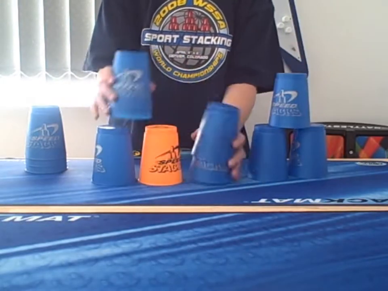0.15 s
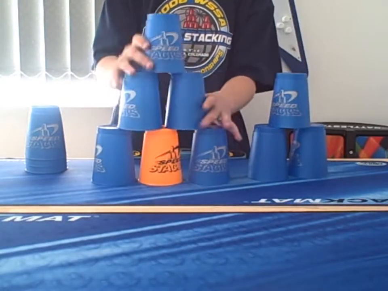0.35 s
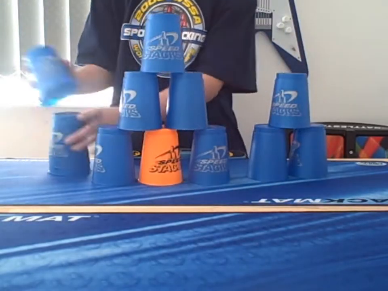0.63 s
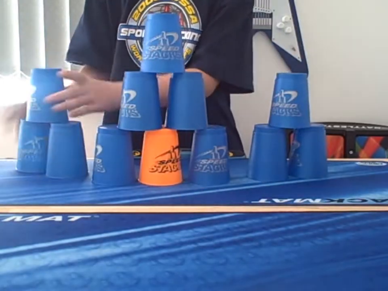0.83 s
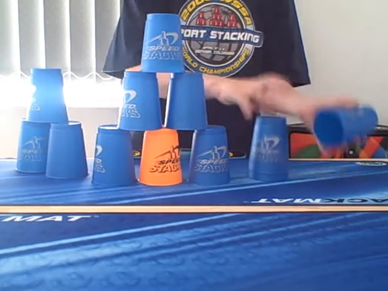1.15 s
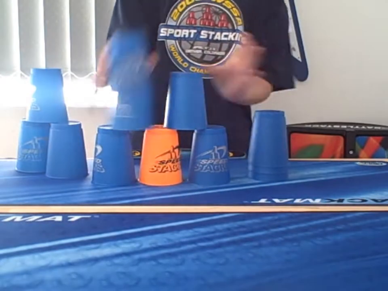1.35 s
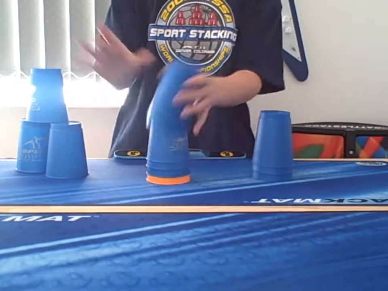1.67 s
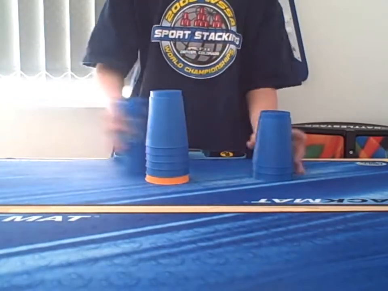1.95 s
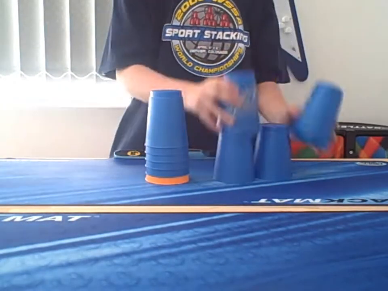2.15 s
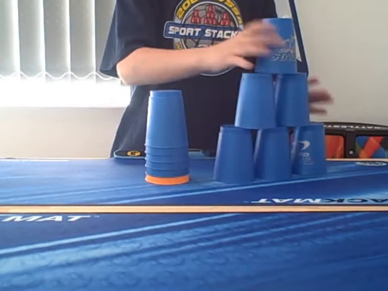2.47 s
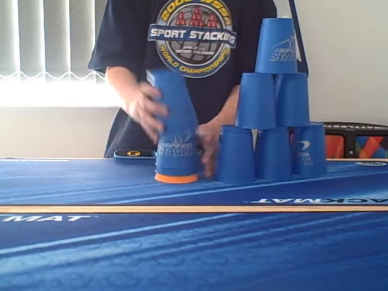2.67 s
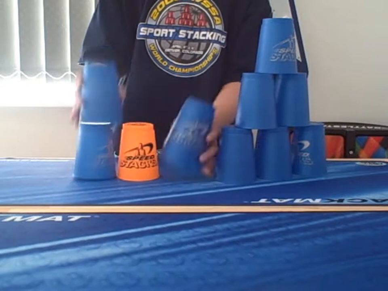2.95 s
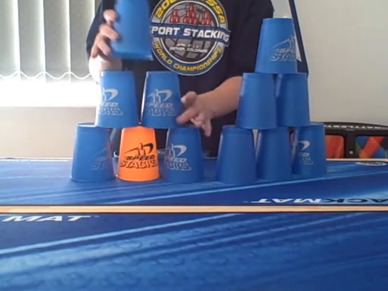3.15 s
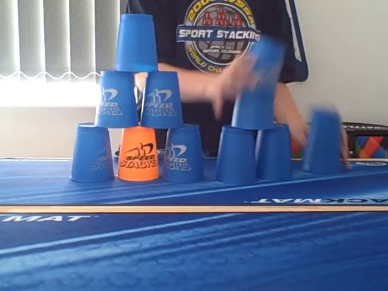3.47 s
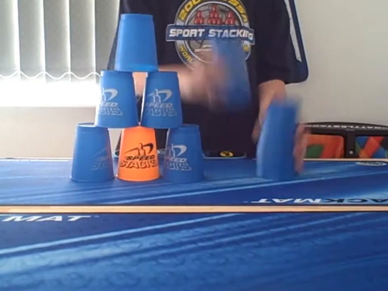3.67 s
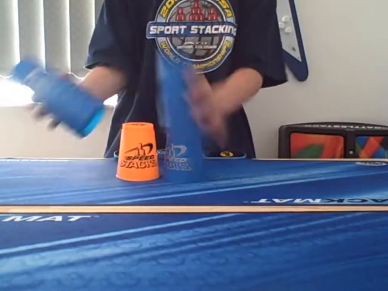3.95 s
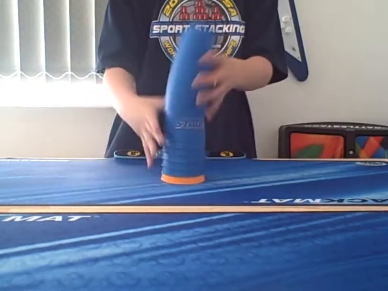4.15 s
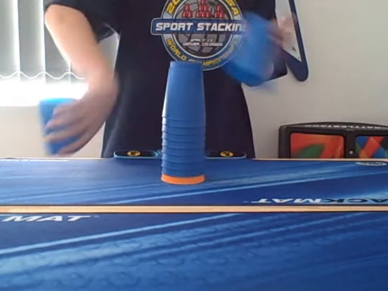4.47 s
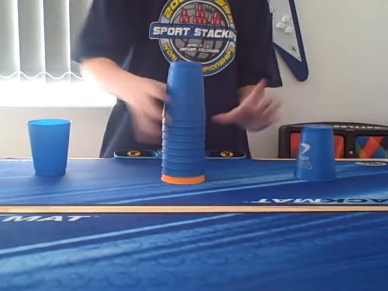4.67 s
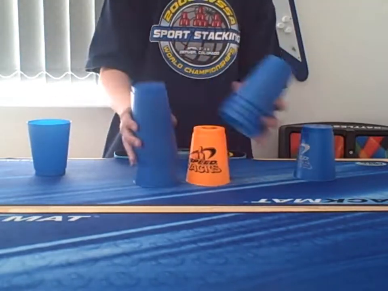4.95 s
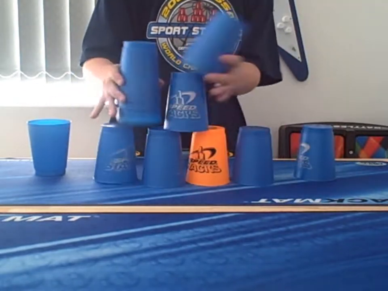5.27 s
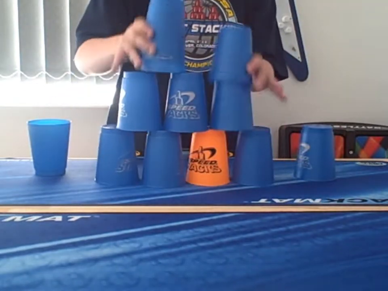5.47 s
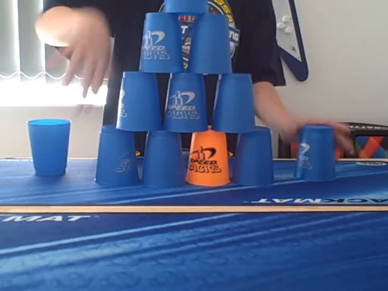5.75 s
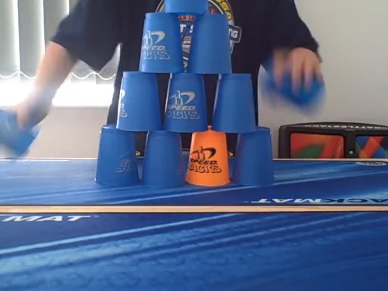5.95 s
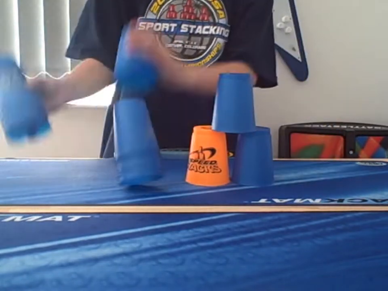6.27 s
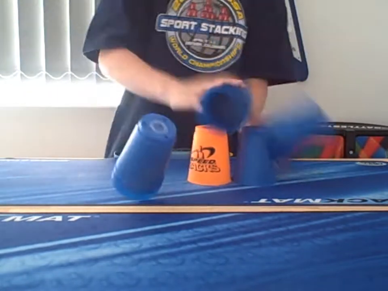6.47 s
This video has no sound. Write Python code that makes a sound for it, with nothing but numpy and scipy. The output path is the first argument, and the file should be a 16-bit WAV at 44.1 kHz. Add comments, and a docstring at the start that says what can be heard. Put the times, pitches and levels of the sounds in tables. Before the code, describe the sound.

Hollow plastic cups are handled at speed on a padded table, close to the microphone in a small, fairly dry room with faint hiss. Soft taps and scrapes lead into a rapid cluster of clacks to 0.5 s, then separate sharp knocks near 0.8 and 0.9. After a short gap, nesting slides and clicks rattle from 1.15 to 2.05, brightest around 1.5 and 1.9. Lighter placements follow at 2.35-2.55, then a lull with faint rubbing. Crisp knocks return at 3.1-3.3; from 3.5 to 4.3 cups collapse together in zipping scrapes and clacks, with a heavy thump near 4.0. It thins out, with a knock at 4.6, then quick stacking clacks run from 5.0 to 5.7. A quiet pause with faint rubbing precedes the loudest part, 6.2-6.6: a dense, harsh clatter of tumbling cups, slightly clipped, breaking off abruptly.

```python
"""A mat-covered table in a small furnished room: light plastic cups are stacked and nested at speed, close up.
Each contact is noise-driven modes of shell, walls, rim and table plus a shaped noise click.
Between contacts walls scrape: noise in uneven slips feeds the modes and a hiss. Heavy landings thump the table.
Contacts and scrapes get noise tails as room answer; quiet room tone lies below, and the loudest blows clip."""
import sys
import numpy as np
from scipy import signal
from scipy.fft import rfft, irfft, next_fast_len
from scipy.io import wavfile
from scipy.ndimage import uniform_filter1d

SR = 44100
rng = np.random.default_rng(int(sys.argv[2]) if len(sys.argv) > 2 else 0)


def store_pcm(level_fs):
    """Save levels as 16-bit WAV."""
    pcm = np.round(np.clip(level_fs, -1, 1) * 32767).astype(np.int16)
    wavfile.write(sys.argv[1], SR, np.atleast_2d(pcm).T)


N = 291942  # samples in the scene
SPAN = 16384  # block in samples; sounds and tails last fractions of it

# Cup contacts. Each row: start in seconds, shell level in dB, centre of the shell's ring in Hz, click level in dB.
CONTACTS = [(0.043, -36.5, 770, -34), (0.145, -28.5, 1040, -49.5), (0.188, -21.5, 560, -18),
            (0.258, -26, 556, -30), (0.321, -26, 1100, -43), (0.339, -18, 1120, -44),
            (0.351, -20, 950, -26), (0.436, -17.5, 990, -34), (0.45, -6.5, 1030, -15.5),
            (0.476, -16, 910, -27), (0.63, -26, 1230, -26), (0.691, -28, 790, -27),
            (0.777, -5.5, 1080, -14), (0.879, -23.5, 620, -45), (0.902, -7.5, 980, -14),
            (1.136, -44.5, 600, -53.5), (1.145, -15, 910, -31), (1.221, -32.5, 580, -23.5),
            (1.256, -41, 1200, -35), (1.343, -52, 594, -36.5), (1.381, -47, 842, -38.5),
            (1.409, -27, 730, -36), (1.432, -22.5, 860, -29.5), (1.459, -25, 1160, -48),
            (1.474, -20, 1130, -18.5), (1.503, -21.5, 900, -25), (1.531, -10.5, 780, -9),
            (1.581, -31, 980, -21), (1.617, -25, 730, -22.5), (1.721, -18.5, 586, -14.5),
            (1.765, -21, 790, -21), (1.792, -25.5, 754, -21), (1.819, -19, 720, -21),
            (1.878, -17.5, 980, -24), (1.89, -25, 920, -15), (1.907, -11.5, 745, -7.5),
            (2.011, -24, 537, -20.5), (2.026, -23.5, 464, -28.5), (2.24, -35, 1170, -44),
            (2.337, -33, 610, -40.5), (2.358, -26, 595, -21.5), (2.394, -13.5, 960, -18.5),
            (2.452, -28, 985, -31), (2.515, -18, 926, -30.5), (2.535, -13, 1050, -26),
            (2.749, -40, 1120, -45), (2.783, -41, 770, -41), (2.855, -46.5, 900, -47),
            (2.983, -41.5, 556, -47), (2.994, -32, 537, -37.5), (3.003, -36, 1090, -35),
            (3.074, -37.5, 655, -41.5), (3.102, -22.5, 567, -26), (3.165, -10.5, 1100, -18.5),
            (3.182, -11, 950, -21.5), (3.217, -24, 1030, -37.5), (3.237, -16.5, 980, -32),
            (3.267, -30, 1150, -33.5), (3.286, -6, 1020, -16.5), (3.294, -14.5, 990, -27.5),
            (3.505, -23, 750, -34), (3.541, -21.5, 940, -35), (3.565, -27, 546, -29.5),
            (3.598, -24, 580, -15.5), (3.623, -8, 730, -9), (3.648, -17.5, 705, -41.5),
            (3.78, -35, 554, -29.5), (3.801, -27, 675, -33), (3.813, -18, 870, -30.5),
            (3.877, -23.5, 900, -33.5), (3.906, -22, 890, -25.5), (3.928, -16.5, 990, -55.5),
            (3.988, -5, 574, -6), (4.011, -17, 660, -31.5), (4.071, -18, 770, -22),
            (4.083, -30, 1130, -20.5), (4.098, -15.5, 980, -14.5), (4.132, -22.5, 1040, -21.5),
            (4.154, -24, 630, -22.5), (4.214, -24.5, 700, -24.5), (4.219, -23.5, 660, -13),
            (4.264, -28.5, 770, -23), (4.348, -43, 1120, -35.5), (4.595, -25, 880, -46),
            (4.627, -15, 520, -27), (4.798, -32, 1000, -32), (4.894, -35, 804, -39.5),
            (4.937, -27, 980, -42), (5.015, -26, 607, -40), (5.021, -19.5, 594, -22),
            (5.105, -20.5, 590, -22.5), (5.235, -38, 650, -33), (5.284, -9, 980, -17),
            (5.308, -11, 1070, -21.5), (5.381, -13, 740, -22), (5.4, -21.5, 593, -28),
            (5.419, -18.5, 910, -19), (5.452, -20.5, 930, -34.5), (5.476, -26, 904, -39.5),
            (5.543, -14, 980, -29.5), (5.568, -7.5, 1050, -17), (5.589, -26, 1040, -41.5),
            (5.655, -19.5, 980, -41), (5.69, -7, 1010, -17), (5.707, -11.5, 1080, -21.5),
            (5.953, -42, 464, -67), (6.178, -23, 1120, -19), (6.195, -25, 900, -26),
            (6.221, -14, 950, -11.5), (6.233, -11.5, 810, 0), (6.241, -8.5, 730, -22.5),
            (6.27, -4, 1210, 1), (6.281, -11.5, 620, -26.5), (6.362, -21.5, 1010, -23.5),
            (6.425, -21.5, 1230, -15), (6.467, 0.5, 1130, -9.5), (6.48, -10, 1000, -12),
            (6.524, -6.5, 880, -1.5), (6.542, -16, 1190, -18.5), (6.552, -23, 517, -18.5),
            (6.571, -36, 650, -30.5), (6.603, -16, 490, -8.5)]
# Cups sliding over each other and over the mat. Each row: start and end in seconds, shell and hiss level in dB.
SCRAPES = [(0, 0.144, -49.5, -49), (0.123, 0.169, -42.5, -36), (0.198, 0.255, -30.5, -38),
           (0.258, 0.32, -35, -49), (0.318, 0.408, -27.5, -43.5), (0.638, 0.756, -47, -52),
           (1.148, 1.194, -27.5, -50.5), (1.195, 1.262, -53, -39.5), (1.251, 1.303, -40, -43),
           (1.369, 1.463, -46, -44), (1.446, 1.526, -35.5, -29.5), (1.527, 1.65, -36, -43.5),
           (1.611, 1.69, -33, -34), (1.738, 1.867, -40, -47.5), (1.858, 1.923, -29.5, -37.5),
           (1.909, 1.952, -36, -26), (2.023, 2.101, -49.5, -40.5), (2.173, 2.225, -60.5, -46),
           (2.234, 2.307, -49, -53), (2.401, 2.493, -30, -60.5), (2.518, 2.579, -21, -36.5),
           (2.749, 2.891, -52.5, -53), (2.938, 2.994, -62, -45), (2.999, 3.08, -52.5, -49.5),
           (3.091, 3.139, -31.5, -44.5), (3.179, 3.278, -24.5, -53.5), (3.496, 3.582, -31, -46),
           (3.557, 3.619, -27, -33), (3.589, 3.631, -22.5, -30.5), (3.616, 3.705, -36, -42),
           (3.688, 3.732, -50.5, -41.5), (3.793, 3.844, -28.5, -34.5), (3.909, 4.013, -25, -30),
           (4.013, 4.075, -35, -40.5), (4.078, 4.136, -24.5, -28), (4.145, 4.204, -38, -46.5),
           (4.216, 4.24, -44, -36), (4.252, 4.325, -32.5, -38.5), (4.438, 4.525, -66.5, -48.5),
           (4.605, 4.669, -26, -56), (4.789, 4.858, -45, -46.5), (4.844, 4.881, -38.5, -41),
           (4.959, 5.015, -68, -51.5), (5.029, 5.107, -46, -46.5), (5.109, 5.177, -30, -43.5),
           (5.315, 5.324, -41, -35.5), (5.384, 5.46, -25.5, -40), (5.576, 5.624, -25.5, -56.5),
           (5.635, 5.695, -26.5, -44), (5.846, 6.077, -55.5, -54.5), (6.188, 6.243, -19.5, -23),
           (6.225, 6.295, -22, -27.5), (6.278, 6.316, -28.5, -27.5), (6.369, 6.465, -40, -55.5),
           (6.485, 6.53, -19.5, -25.5), (6.535, 6.541, -24, -6), (6.562, 6.605, -19, -35)]
# Heavy landings that shake the table top. Each row: start in seconds, level in dB.
THUMPS = [(0.182, -33.5), (0.448, -52), (1.134, -49), (1.517, -28.5), (1.707, -33.5), (1.83, -36),
          (1.901, -30), (2.011, -49), (2.352, -44), (2.518, -55), (2.751, -44.5), (2.99, -38), (3.095, -40),
          (3.6, -31.5), (3.806, -26), (3.984, -15), (4.097, -20), (4.209, -24.5), (4.262, -27),
          (4.283, -27), (4.614, -53), (4.783, -39), (5.007, -37), (5.098, -35), (5.378, -46),
          (5.933, -33.5), (6.228, -44), (6.272, -23), (6.29, -18.5), (6.469, -21.5), (6.529, -19),
          (6.601, -25)]
# Modes of the cup shell. Each row: pitch in Hz, relative strength in dB, time to decay by 60 dB in seconds.
SHELL = [(554.4, -3, 0.063), (640, -1.5, 0.033), (706, -2.5, 0.02), (770, -2, 0.024), (902, -0.5, 0.042),
         (980, -1, 0.057), (1090, -1.5, 0.037), (1160, -2, 0.021), (1280, -9.5, 0.019)]
# Low modes of the table top. Each row: pitch in Hz, relative strength in dB, 60 dB decay in seconds.
TABLE_TOP = [(50.4, -8, 0.17), (84.7, -3, 0.22), (138.6, 12, 0.19), (190, -0.5, 0.044)]
# High modes of the cup walls. Each row: pitch in Hz, relative strength in dB, 60 dB decay in seconds.
WALLS = [(1544, 4.5, 0.0057), (1940, 7, 0.0052), (2150, 5.5, 0.012), (2606, -2.5, 0.031), (3010, -12, 0.03),
         (3170, -14.5, 0.005)]
# Low knocking modes of the rim. Each row: pitch in Hz, relative strength in dB, 60 dB decay in seconds.
RIM = [(181, -12, 0.027), (267.8, 1.5, 0.047), (331.5, 0.5, 0.042), (456, 0, 0.026)]


def amp(db):
    """Decibels to amplitude factor."""
    return 10 ** (np.asarray(db) / 20)


def unit(x):
    """x scaled to an RMS of 1."""
    return x / np.sqrt(np.mean(x ** 2) + 1e-20)


def along(points, hz):
    """Values at hz, between (Hz, value) points on a log axis."""
    f, v = np.transpose(points)
    return np.interp(np.log(hz + 1), np.log(f + 1), v)


def filtered(x, response):
    """x times a response of frequency, along the last axis."""
    m = next_fast_len(x.shape[-1] + 2048)
    spectrum = rfft(x, m) * response(np.fft.rfftfreq(m, 1 / SR))
    return irfft(spectrum, m)[..., :x.shape[-1]]


def peak_one(rows):
    """Each row scaled so that its loudest 4 ms have a mean power of 1."""
    power = uniform_filter1d(rows ** 2, size=SR // 250, axis=1)
    return rows / np.sqrt(np.abs(power).max(axis=1, keepdims=True) + 1e-20)


def resonances(modes, luck_db=0, detune=1):
    """Causal response of damped modes of alternating sign; each may get its own strength and tuning."""
    hz, db, t60 = np.transpose(modes)[..., None]
    width = np.log(1000) / (np.pi * t60)  # Hz; a faster decay makes a broader peak
    gain = (-1.) ** np.arange(len(modes))[:, None] * amp(db + luck_db)

    def response(f):
        damping = 1j * f * width
        return np.sum(gain * damping / ((hz * detune) ** 2 - f * f + damping), axis=-2)
    return response


def struck(force, modes, spread_db, stray, favour_db=0):
    """Every blow meets another spot: new mode strengths (spread_db), slightly other pitches (stray, a ratio)."""
    luck = rng.standard_normal((len(force), 2, len(modes), 1))
    body = resonances(modes, favour_db + spread_db * luck[:, 0], 1 + stray * luck[:, 1])
    return peak_one(filtered(force, body))


def rubbed(noise, modes, spread_db, stray):
    """Rubbing noise through modes that each slide weights and tunes its own way, evened out to equal power."""
    luck = rng.standard_normal((len(noise), 2, len(modes), 1))
    body = resonances(modes, spread_db * luck[:, 0], 1 + stray * luck[:, 1])
    power_gain = np.mean(np.abs(body(np.fft.rfftfreq(SPAN // 4, 1 / SR))) ** 2, axis=1, keepdims=True)
    return filtered(noise, body) / np.sqrt(power_gain)


def nested(start_s):
    """Extra ring of the walls in dB at a time, while cups slide into or out of each other wall on wall."""
    # Spells of nesting. Each row: start and end in seconds, extra ring of the walls in dB.
    spells = [(0.62, 0.7, 10.5), (1.24, 1.33, 19), (1.465, 1.57, 12), (1.6, 1.73, 12), (1.78, 1.83, 5),
              (1.9, 1.98, 12), (2.23, 2.31, 18), (3.0, 3.02, 12.5), (3.58, 3.7, 9), (3.79, 3.83, 17.5),
              (3.98, 4.03, 10.5), (4.07, 4.14, 11.5), (4.2, 4.3, 10), (5.41, 5.46, 9), (6.21, 6.44, 10.5),
              (6.51, 6.62, 10)]
    return sum(db * (start_s >= a) * (start_s < b) for a, b, db in spells)


def room_tone():
    """Room tone and hiss: steady noise with a fixed spectrum."""
    # Spectrum of the quiet room. Each row: frequency in Hz, relative density in dB per Hz.
    quiet_spectrum = [(18, -31), (30, 7), (55, -15), (93, -4), (266, -14.5), (600, -25), (962, -19.5),
                      (1810, -33), (2540, -26), (16000, -34.5)]
    noise = filtered(rng.standard_normal(N), lambda f: amp(along(quiet_spectrum, f)))
    return amp(-55.5) * unit(noise)


def scrapes():
    """Rows of dry slides: walls slip unevenly and feed the cup modes, swelling in and stopping short."""
    # Spectrum of sliding plastic. Each row: frequency in Hz, relative density in dB per Hz.
    hiss_spectrum = [(1500, -5), (2600, -1.5), (4000, -1), (6000, 1), (8500, -0.5), (12000, -5),
                     (16500, -7.5)]
    start, end, shell_db, hiss_db = np.transpose(SCRAPES)[..., None]
    walls_db = hiss_db - 10 + nested(start)  # 10 dB under the hiss for single cups
    t = np.arange(SPAN * 3 // 4) / SR
    swell = np.clip(t / (0.054 * (end - start)), 0, 1)
    stop = np.clip((end - start - t) / 0.03, 0, 1)  # over the last 30 ms
    stroke = swell * stop

    # stick and slip: the level wanders between random points 200 samples apart, 6.4 dB deep
    knots = rng.standard_normal((len(SCRAPES), len(t) // 200 + 2))
    wander = np.array([np.interp(t * SR / 200, np.arange(len(k)), k) for k in knots])
    slips = stroke * amp(6.4 * wander)
    rub = slips[:, None] * rng.standard_normal((len(SCRAPES), 3, len(t)))
    stroke_power = np.mean(stroke ** 2, axis=1)[:, None, None]
    rub /= np.sqrt(np.mean(rub ** 2, axis=2, keepdims=True) / stroke_power)

    hiss = filtered(rub[:, 2], lambda f: amp(along(hiss_spectrum, f)))
    hiss /= np.sqrt(np.mean(amp(2 * along(hiss_spectrum, np.fft.rfftfreq(SPAN, 1 / SR)))))
    shell = rubbed(rub[:, 0], RIM[2:] + SHELL, spread_db=3, stray=.03)
    walls = rubbed(rub[:, 1], WALLS, spread_db=3, stray=.04)
    return amp(shell_db) * shell + amp(walls_db) * walls + amp(hiss_db) * hiss


def contacts():
    """Rows of dry hits: a sharp blow and the chatter after it drive shell, table, rim and walls, with a click."""
    # Spectrum of the click before its tilt. Each row: frequency in Hz, relative density in dB per Hz.
    click_spectrum = [(1500, -0.5), (2600, 3.5), (4000, 2.5), (6000, 3), (9000, -2), (12000, -6.5),
                      (14500, -10.5), (16500, 2)]
    start, shell_db, centre_hz, click_db = np.transpose(CONTACTS)[..., None]
    # dull landings knock the rim most: 16.5 dB less per octave above the lowest shell mode
    rim_db = shell_db - 1.5 - 16.5 * np.log2(centre_hz / SHELL[0][0])
    table_db = rim_db - 12.5
    walls_db = click_db - 11 + nested(start)

    t = np.arange(SPAN // 4) / SR
    chance = rng.standard_normal((len(CONTACTS), 2, len(t)))
    force = 9 * (t == 0) + np.exp(-t / 0.0028) * chance[:, 0]  # blow, then chatter
    # the shell feels the blow through its flexing base
    soft = filtered(force, lambda f: 1 / (1 + 1j * f / 1700) ** 2)

    crack = (.7 * np.exp(-t / .0006) + np.exp(-t / .005)) * chance[:, 1]
    tilt_db = -0.5 + 4 * (nested(start) != 0)  # per octave; nesting rims bite brighter
    click = peak_one(filtered(
        crack, lambda f: amp(along(click_spectrum, f) + tilt_db * np.log2(1 + f / 2000))))

    # grip and nesting damp the modes far from the centre, 14 dB per octave
    favour_db = -14 * np.abs(np.log2(np.array(SHELL)[:, 0] / centre_hz))[..., None]
    shell = struck(soft, SHELL, spread_db=2.5, stray=0.036, favour_db=favour_db)
    fade = np.cos(t / t[-1] * np.pi / 2)  # the table outrings the block
    table_shake = struck(soft, TABLE_TOP[1:], spread_db=3.5, stray=0.03) * fade
    rim = struck(soft, RIM, spread_db=6.0, stray=0.042)
    walls = struck(force, WALLS, spread_db=4.5, stray=.04)
    return (amp(shell_db) * shell + amp(table_db) * table_shake + amp(rim_db) * rim
            + amp(walls_db) * walls + amp(click_db) * click)


def thumps():
    """Rows of table-top shake: a soft, uneven push through the mat rings the low modes and knocks the rims."""
    t = np.arange(SPAN // 2) / SR
    noise = rng.standard_normal((len(THUMPS), len(t)))
    uneven = filtered(noise, lambda f: 8 / (1 + 1j * f / 300))
    push = t * np.exp(-t / 0.00089) + 0.027 * t * np.exp(-t / 0.0088) * uneven
    shake = struck(push, TABLE_TOP, spread_db=6.0, stray=0.02)
    knock = amp(1.5) * struck(push, RIM, spread_db=2.0, stray=0.04)
    return amp(np.array(THUMPS)[:, 1:]) * (shake + knock)


def room(rows, wet_db):
    """Each sound gets its own noise tail 5 ms late, every frequency dying at its own speed."""
    # Decay of the furnished room. Each row: frequency in Hz, time to decay by 60 dB in seconds.
    decay_times = [(100, 0.22), (700, 0.19), (2000, 0.19), (5000, 0.19), (13000, 0.13)]
    noise = rng.standard_normal((len(rows), SPAN // 2))
    hz, t, z = signal.stft(noise, SR, nperseg=256)
    decay = amp(-60 * t / along(decay_times, hz)[:, None])
    tails = signal.istft(z * decay, SR, nperseg=256)[1][:, :SPAN // 2]
    tails /= np.linalg.norm(tails, axis=1, keepdims=True)
    tails = np.pad(tails, ((0, 0), (SR // 200, 0)))
    size = rows.shape[1] + SPAN * 3 // 4
    return irfft(rfft(rows, size) * (1 + amp(wet_db) * rfft(tails, size)), size)


def scene():
    """All scrapes, contacts and thumps at their moments, over the quiet room."""
    out = np.zeros(N + 2 * SPAN)
    sounds = [*room(scrapes(), wet_db=-4.5), *room(contacts(), wet_db=-6.5), *thumps()]
    for row, sound in zip(SCRAPES + CONTACTS + THUMPS, sounds):
        out[round(row[0] * SR):][:len(sound)] += sound
    return (out[:N] + room_tone())[None]


def record(dry):
    """The input clips at full scale with a slightly rounded knee and keeps nothing above its band limit."""
    clipped = dry / (1 + np.abs(dry) ** 12) ** (1 / 12)
    return filtered(clipped, lambda f: f < 15750)  # Hz


dry = scene()
out = record(dry)
store_pcm(out)
```